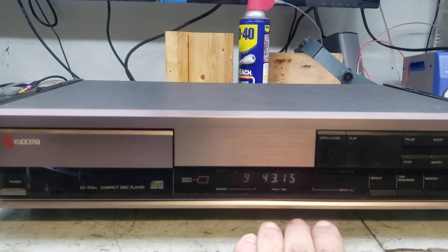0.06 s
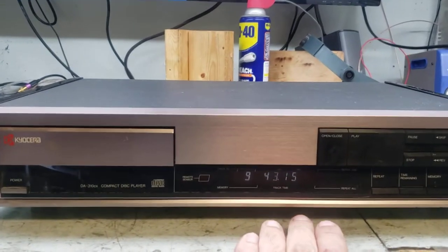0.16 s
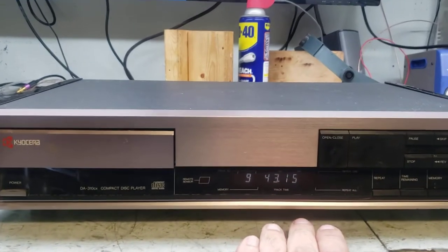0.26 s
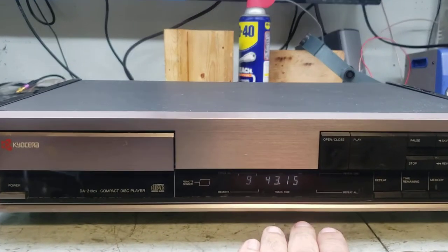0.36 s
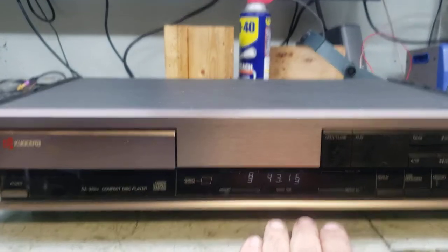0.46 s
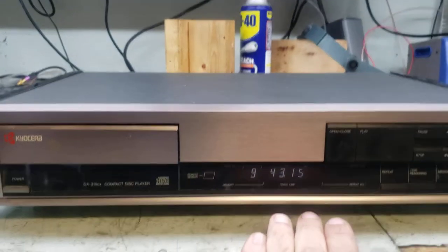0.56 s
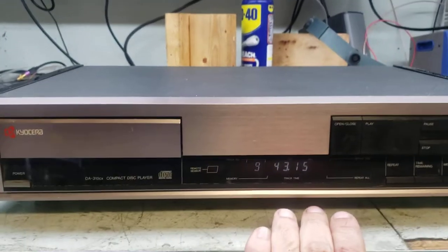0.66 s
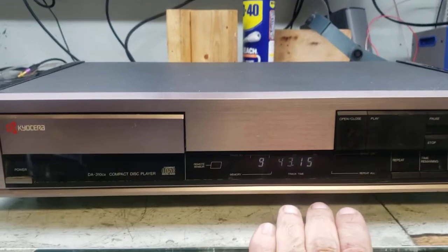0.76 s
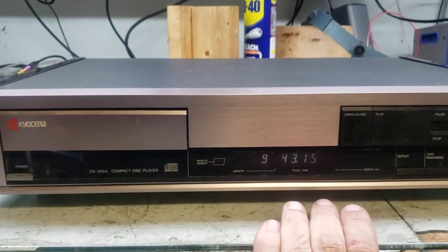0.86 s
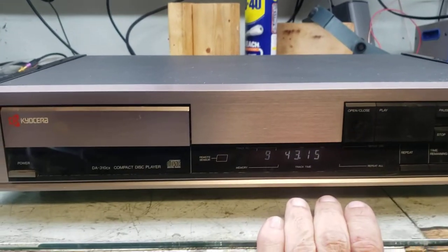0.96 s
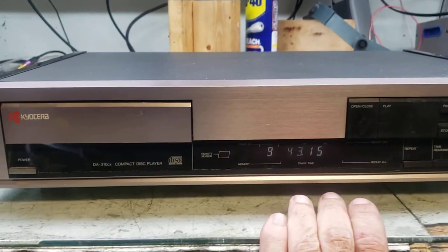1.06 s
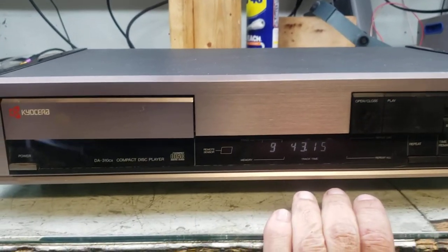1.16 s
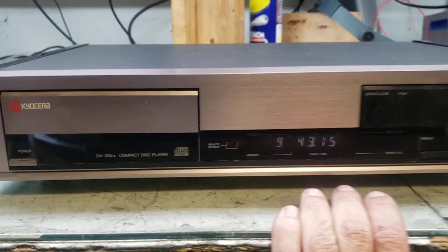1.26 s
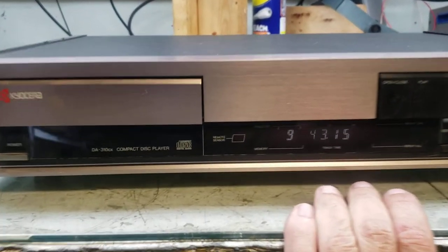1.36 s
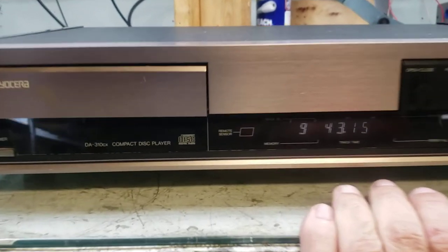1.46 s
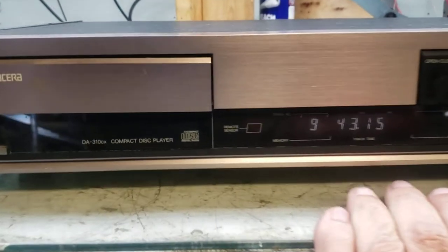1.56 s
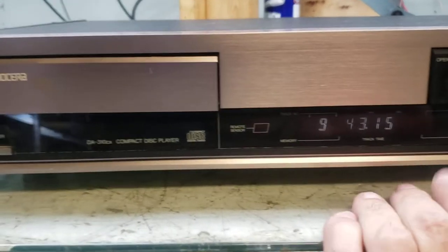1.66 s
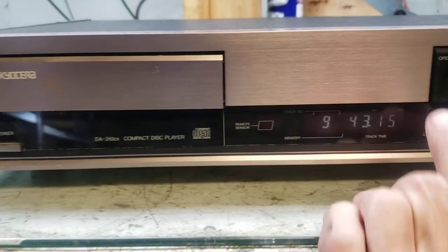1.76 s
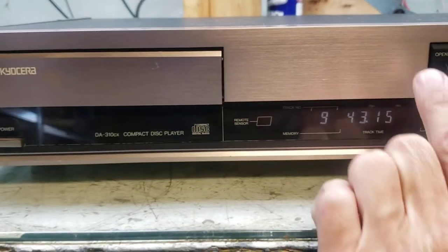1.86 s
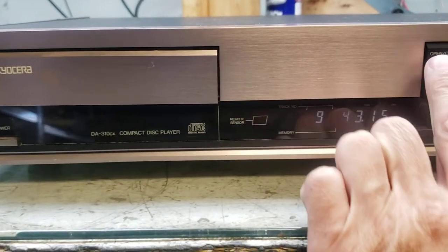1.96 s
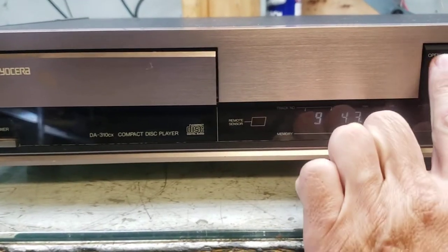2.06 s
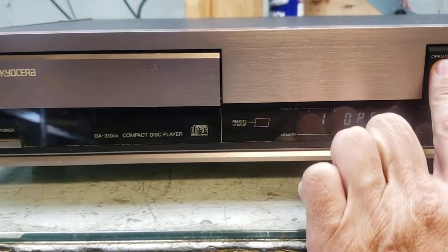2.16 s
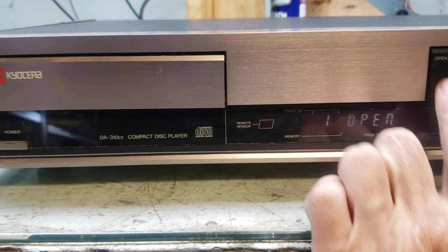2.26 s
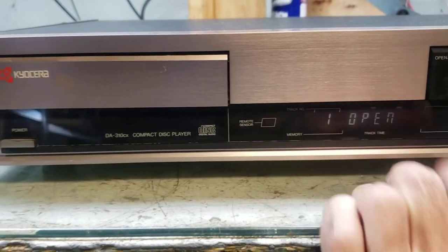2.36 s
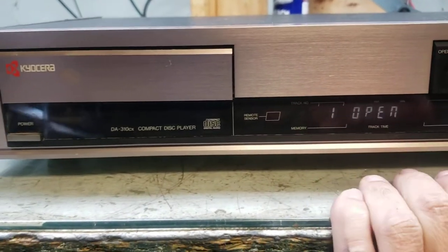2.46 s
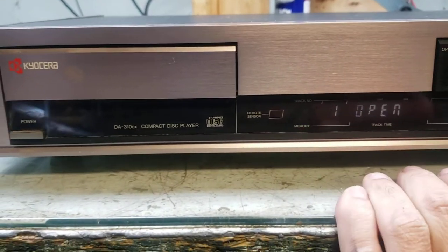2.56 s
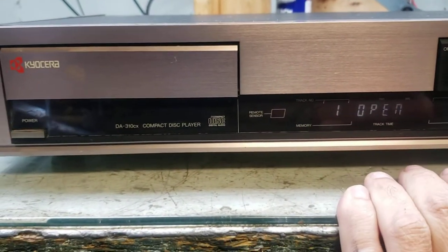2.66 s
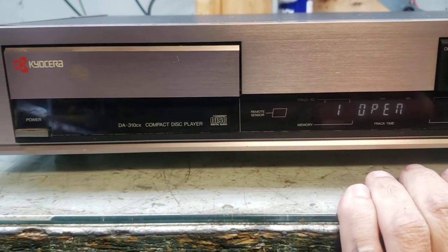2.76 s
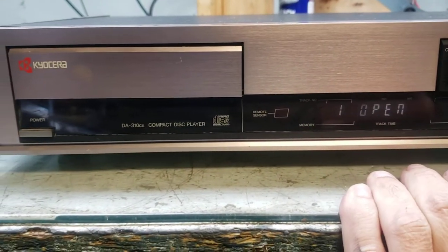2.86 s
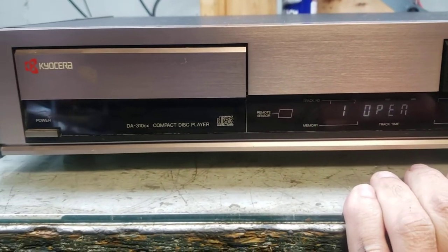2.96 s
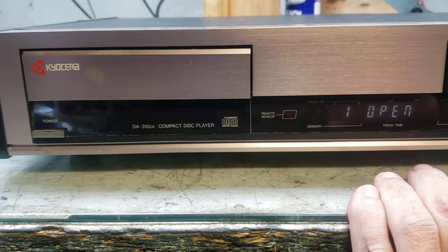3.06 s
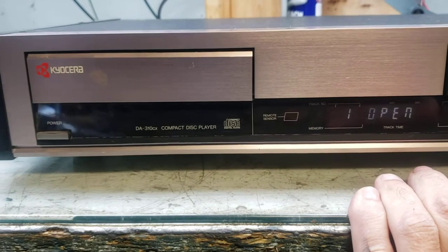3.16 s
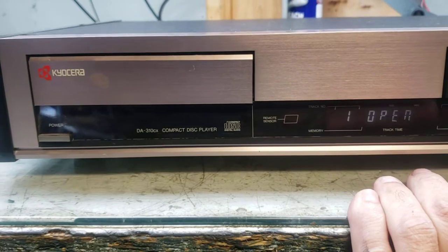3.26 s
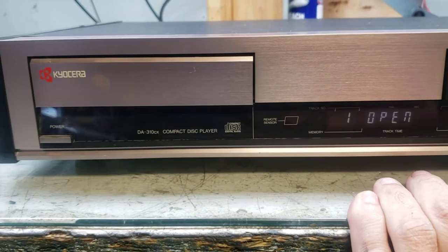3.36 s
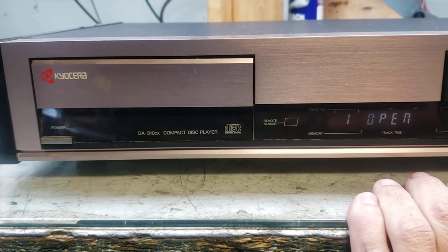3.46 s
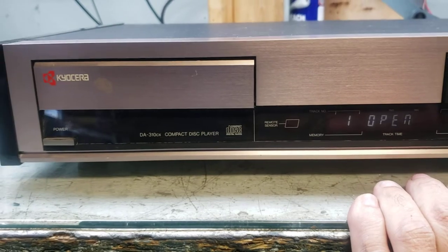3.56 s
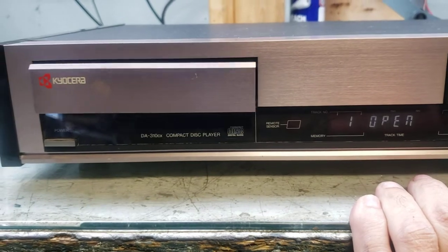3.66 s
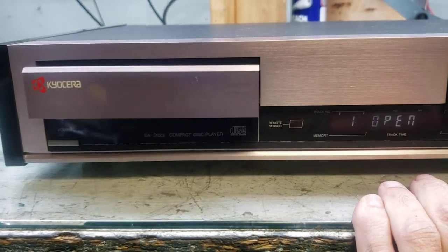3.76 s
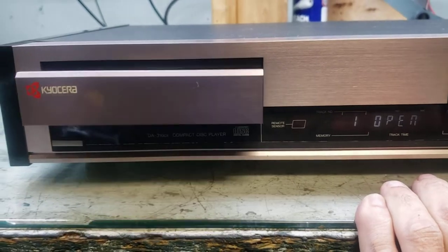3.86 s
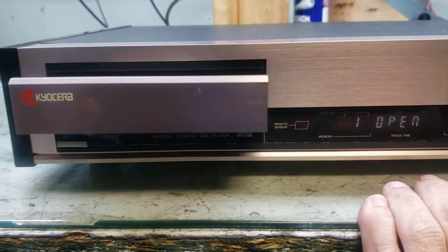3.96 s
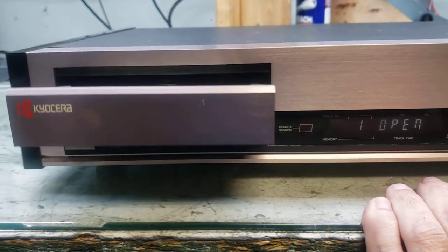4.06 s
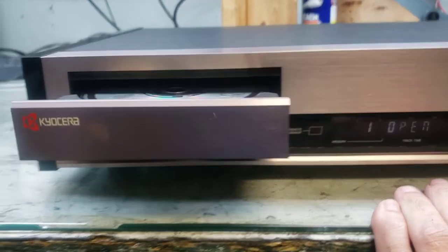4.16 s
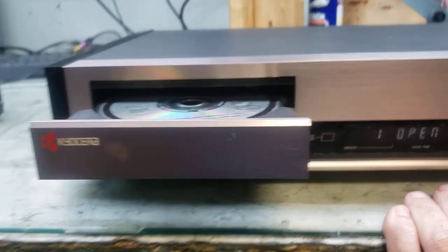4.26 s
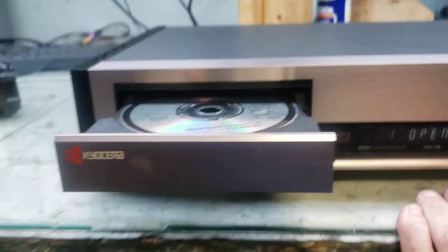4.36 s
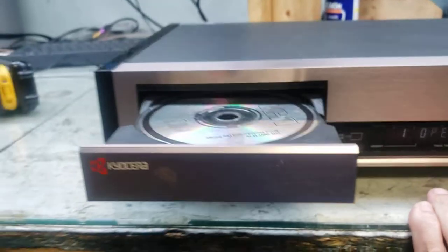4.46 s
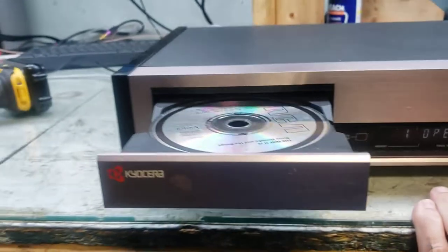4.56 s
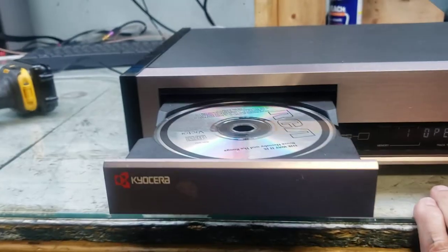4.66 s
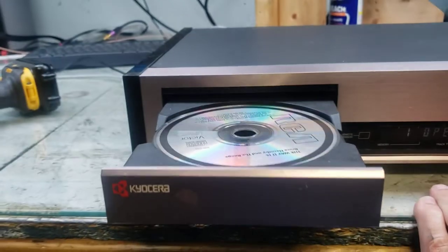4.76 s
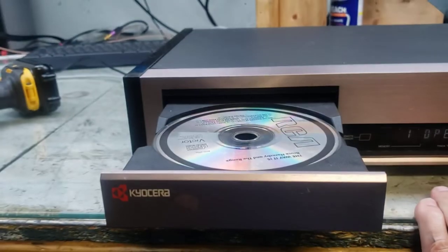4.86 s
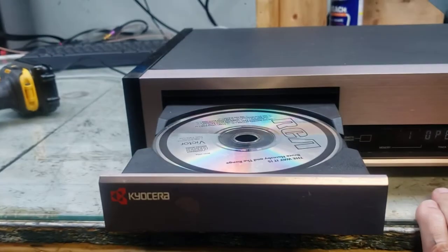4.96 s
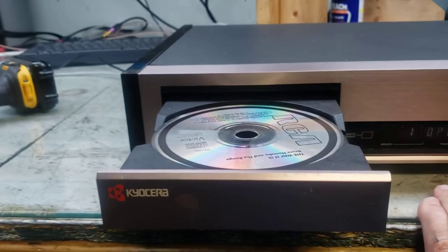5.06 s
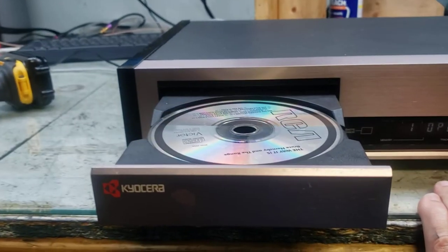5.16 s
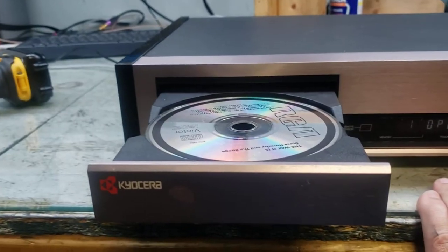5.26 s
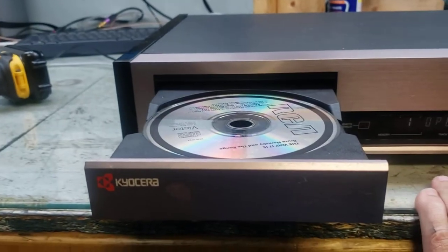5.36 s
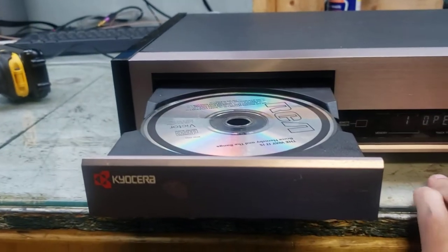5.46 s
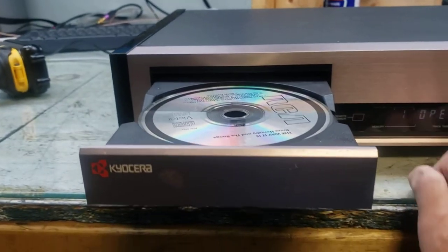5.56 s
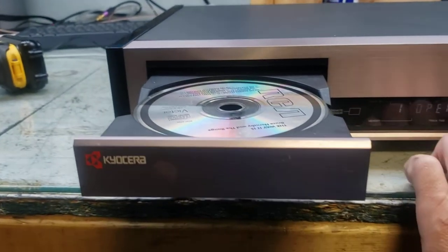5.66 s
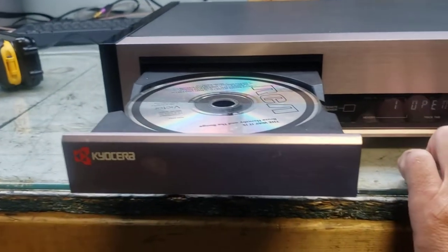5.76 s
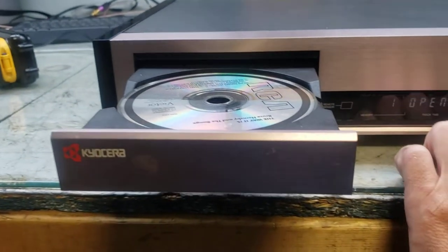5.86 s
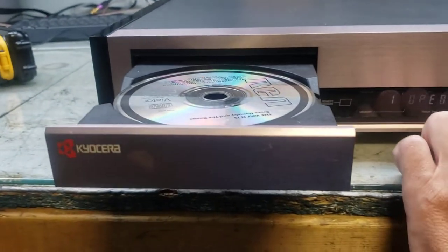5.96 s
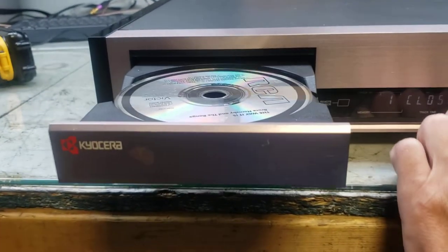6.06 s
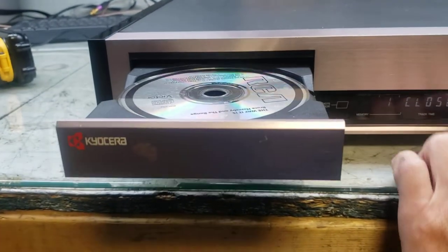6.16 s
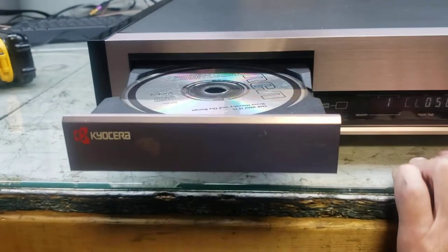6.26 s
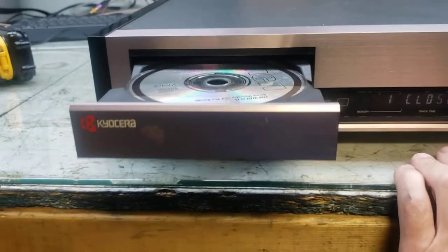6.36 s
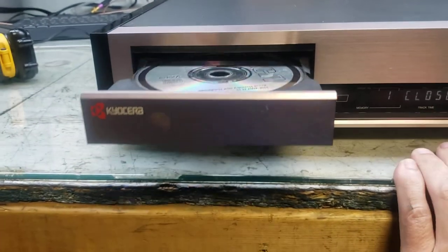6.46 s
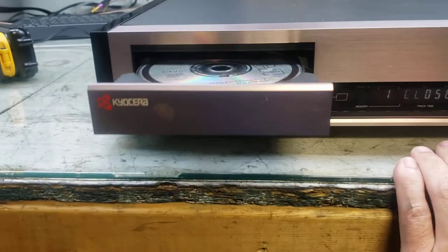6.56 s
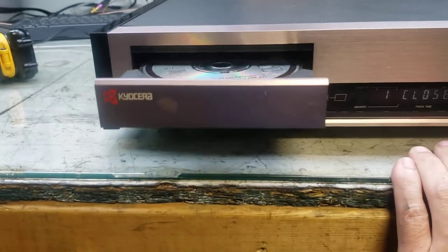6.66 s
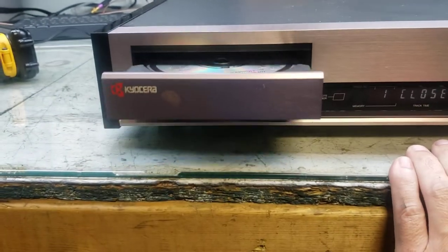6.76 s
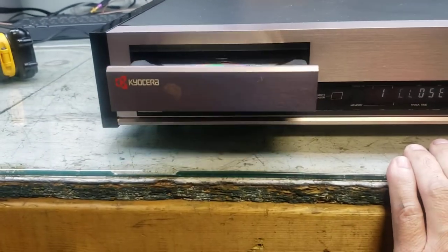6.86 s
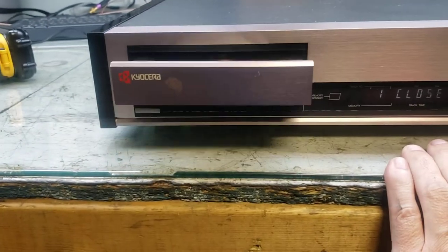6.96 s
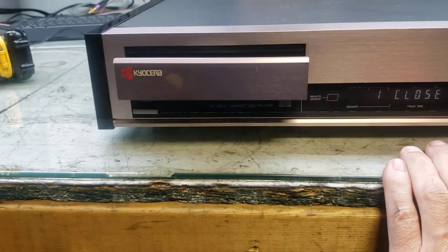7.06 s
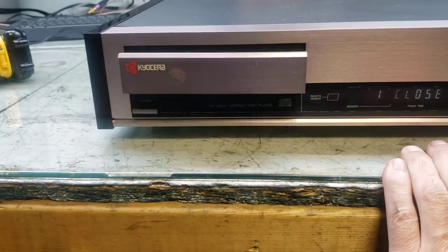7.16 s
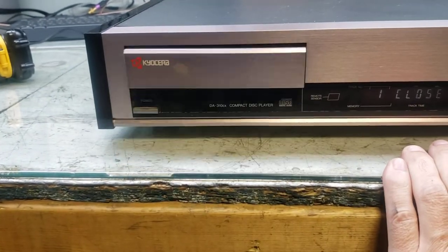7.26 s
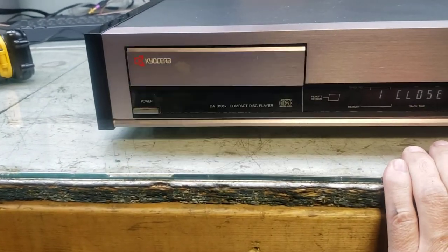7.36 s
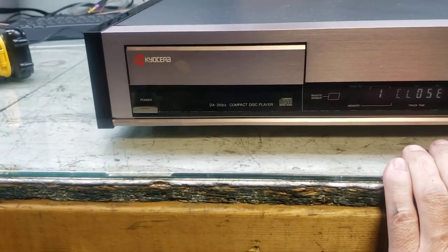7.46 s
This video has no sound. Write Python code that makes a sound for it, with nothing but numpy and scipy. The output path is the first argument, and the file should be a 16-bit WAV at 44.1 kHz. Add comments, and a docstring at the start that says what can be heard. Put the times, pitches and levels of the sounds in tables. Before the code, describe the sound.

A quiet workshop hums low and wavers slightly. Near the microphone, a button is touched, snapped and released, with a wisp of rubbing. After a soft low swell, the player's latch lets go in a solid clunk and its plastic tray hisses outward, stopping gently. Following a pause, another click starts the return slide, which finishes with several tight plastic and metal knocks and a short, dull bench reflection.

```python
"""A disc player on a workbench, over motor hum, room rumble and hiss: skin and sleeve brush by, and a finger presses
the open button. A low drone swells and fades; the latch lets go with a clunk and the tray slides out.
A second press draws it back in and it rattles shut. Hum is a sum of sines, rubbing is coloured noise,
and each contact is a burst of tiny impacts exciting damped modes. Two unlike microphones colour it all."""
import sys
import numpy as np
from scipy import signal
from scipy.fft import rfft, irfft
from scipy.io import wavfile
from scipy.ndimage import uniform_filter1d, map_coordinates

SR = 44100
rng = np.random.default_rng(int(sys.argv[2]) if len(sys.argv) > 2 else 0)


def dump(signal):
    """Clip the signal to [-1, 1] and save it as 16-bit WAV at the path in sys.argv[1]."""
    limited = np.clip(np.atleast_2d(signal).T, -1, 1)
    pcm = np.round(limited * 32767).astype(np.int16)
    wavfile.write(sys.argv[1], SR, pcm)


N = 331632
SIDES = np.array([[.5], [-.5]])  # shares a left-right difference equally


def from_db(db):
    """Level definition: decibels to amplitude gain."""
    return 10 ** (np.asarray(db) / 20)


def rms_one(x):
    """Normalisation: scale to rms 1."""
    return x / np.sqrt(np.mean(x ** 2) + 1e-20)


EDGE_S = .04  # fade before and after each curve


def in_time(spans):
    """Envelope interpolation: level columns at every sample, silent outside each span."""
    rows = []
    for span in spans:
        silence = [-120] * (len(span[0]) - 1)
        rows.append((span[0][0] - EDGE_S, *silence))
        rows.extend(span)
        rows.append((span[-1][0] + EDGE_S, *silence))
    s, *columns = np.transpose(rows)
    return [np.interp(np.arange(N) / SR, s, column) for column in columns]


def at_hz(points, size):
    """Spectral interpolation: an (f, value) table on a log frequency axis, read at the FFT bins."""
    hz, value = np.transpose(points)
    return np.interp(np.log(np.fft.rfftfreq(size, 1 / SR) + 1), np.log(hz + 1), value)


def drift(rate):
    """Slow random modulation: a cubic spline through about 2 * rate random knots a second."""
    knots = int(N / SR * rate * 2) + 4
    return map_coordinates(rng.standard_normal(knots), [np.linspace(1, knots - 2, N)], order=3)


def stereo_noise(spectrum, alike, size=N):
    """Partial correlation: coloured noise of rms 1 whose two sides have correlation alike."""
    mid, side = rfft(rng.standard_normal((2, size)))
    both = np.sqrt(1 + alike) * mid + np.sqrt(1 - alike) * side * [[1], [-1]]
    return rms_one(irfft(both * from_db(at_hz(spectrum, size)), size))


def resonance(x, hz, width_hz):
    """Simple resonator: a pole pair gives one peak of the given bandwidth; rms 1."""
    r = np.exp(-np.pi * width_hz / SR)
    return rms_one(signal.lfilter([1, 0, -1], [1, -2 * r * np.cos(2 * np.pi * hz / SR), r * r], x))


# room rumble: f/Hz, relative density/dB per Hz
RUMBLE_COLOUR = [(15, -42), (28, -10), (42, 4.5), (51, -13.5), (59, -2.5), (72, -5.5), (90, -13.5),
                 (106, -11), (135, -16.5), (175, -8), (225, -16.5), (310, -21.5), (400, -36.5), (550, -66)]
# far room noise and microphone hiss: f/Hz, relative density/dB per Hz
HISS_COLOUR = [(220, -22), (380, -2), (550, -8), (780, -7), (1000, -13.5), (1300, -12), (2000, -18),
               (5900, -25), (6200, -21.5), (7200, -18), (8350, -29.5), (10000, -23.5), (11000, -17),
               (15650, -15.5), (15800, -54.5)]
# stereo balance of the hiss: f/Hz, left minus right level/dB
HISS_BALANCE = [(1000, 2), (2400, 0), (3800, 5.5), (5500, -3), (6600, 1), (8000, 7), (10500, 9.5),
                (15000, 1.5)]
# likeness of the two sides of the room noise: f/Hz, correlation/1
ROOM_CORRELATION = [(30, 1), (300, 0.91), (640, 0.2), (1400, 0.028), (3000, 0.011)]
RUMBLE_DB, HISS_DB = -50, -73


def room_noise():
    """Diffuse field: the two sides correlate in the bass and hardly in the treble."""
    alike = at_hz(ROOM_CORRELATION, N)
    hiss = stereo_noise(HISS_COLOUR, alike)
    hiss = irfft(rfft(hiss) * from_db(SIDES * at_hz(HISS_BALANCE, N)), N)
    return from_db(RUMBLE_DB) * stereo_noise(RUMBLE_COLOUR, alike) + from_db(HISS_DB) * hiss


# motors in the workshop, two tones near 117 Hz beating: f/Hz, rms level/dB, wavering per unit drift/dB
HUM_TONES = [(58.46, -43.5, -1.3), (115.8, -65, 8), (118.3, -73, 1), (159.6, -63, 1), (232.1, -69.5, 3),
             (531, -89, 1.5), (790, -92, -3.5)]
# a low drone swells, gliding up to its pitch, and fades
DRONE_PEAK_S, DRONE_RISE_S, DRONE_FALL_S = 2.95, 0.26, 0.48
DRONE_DB, DRONE_SWELL_DB = -51, 13  # rms at the peak; drop one rise or fall time away
DRONE_HZ, DRONE_GLIDE_HZ_PER_S = 137, 45


def hum():
    """Superposition: steady-pitched sines waver in level and beat; a gliding drone joins them."""
    t = np.arange(N) / SR
    tones = 0
    for hz, db, waver_db in HUM_TONES:
        level_db = db + waver_db * drift(2.8)
        tones += from_db(level_db) * np.sin(2 * np.pi * (hz * t + rng.random()))
    early, late = np.maximum(DRONE_PEAK_S - t, 0), np.maximum(t - DRONE_PEAK_S, 0)
    away = early / DRONE_RISE_S + late / DRONE_FALL_S
    drone_hz = DRONE_HZ - DRONE_GLIDE_HZ_PER_S * early
    drone = from_db(DRONE_DB - DRONE_SWELL_DB * away ** 2) * np.sin(2 * np.pi * np.cumsum(drone_hz) / SR)
    return np.sqrt(2) * (tones + drone)  # a sine of rms 1 peaks at sqrt(2)


BENCH_T60_S = .17


def bench(x):
    """Reverberation: bench and wall return a short dull tail, convolved in independently on each side."""
    t = np.arange(SR // 2) / SR
    tail = stereo_noise([(200, -8.5), (2500, -2), (16000, -10.5)], 0, size=len(t))
    tail = tail * from_db(-60 * t / BENCH_T60_S) * (t > .004)
    return signal.fftconvolve(x, tail / np.sqrt(np.sum(tail[0] ** 2)), axes=1)[:, :N]


# skin and sleeve as the hand reaches and leaves: t/s, duller part level/dB, brighter part level/dB
BRUSH_LEVELS = [
    [(1.68, -83, -90), (1.862, -81, -71.5), (2.06, -80, -71)],
    [(2.28, -76, -69), (2.332, -74.5, -75), (2.36, -67.5, -64), (2.462, -67.5, -57.5), (2.51, -79, -74),
     (2.574, -84, -89)],
]
# colours of the two parts: f/Hz, relative density/dB per Hz
DULL_COLOUR = [(4000, -18.5), (5100, -16), (6900, 1), (7600, -2), (8400, -12), (9000, -38)]
BRIGHT_COLOUR = [(8000, -22), (8800, -8.5), (10600, 0), (13000, -4), (15600, 5.5), (15800, -44)]


def brushing():
    """Friction noise: two coloured bands follow the hand and flutter; the right side is 6 dB louder."""
    hand = 0
    for db, colour in zip(in_time(BRUSH_LEVELS), [DULL_COLOUR, BRIGHT_COLOUR]):
        hand += from_db(db + 2.5 * drift(24.0)) * stereo_noise(colour, 0.085)
    return from_db(-6 * SIDES) * hand


# tray out, then in: start t/s, stop t/s, rub level/dB, extra level of resonances above 8 kHz/dB
TRAY_TRAVELS = [(3.537, 4.871, -67.5, 2.5), (6.02, 7.38, -69, 8)]
# colour of the rails rubbing: f/Hz, relative density/dB per Hz
RAIL_COLOUR = [(500, -15.5), (1000, -10.5), (1900, -14.5), (2900, -12.5), (4500, -12.5), (5900, -14),
               (6500, -7), (7200, -4.5), (8400, -13.5), (9300, -7), (10600, -6), (13700, -3.5), (15650, 2),
               (15800, -47)]
# tray resonances, each swelling at one place on the rails (0 shut, 1 open):
# f/Hz, width/Hz, level/dB, swell level/dB, place/1, span/1
RAIL_RESONANCES = [(1337, 230, -82, 3, .48, 0.12), (2305, 81, -91, 10.5, .6, 0.07),
                   (2850, 390, -96, 19, 0.04, 0.22), (3770, 490, -85.5, 2.5, 0.54, 0.5),
                   (9700, 540, -91, 12, 0.39, 0.13), (12000, 850, -82.5, 6, 0.52, 0.27)]
# one scuff after each catch of the latch or a rack tooth: t/s, f/Hz, level/dB, t60/s
CATCH_SCUFFS = [(3.715, 3060, -65.5, 0.67), (4.022, 3840, -69.5, 0.74), (4.562, 3680, -62.5, 0.18),
                (6.414, 3950, -68, 0.4), (7.005, 3700, -70, 0.26)]
# where the rails bind: place/1 on the way out, then in
BIND_PLACE = [0.54, 0.36]
# extra rub as each travel starts: level/dB on the way out, then in
START_RUB_DB = [2.5, 1]
BIND_SPAN, BIND_DB, START_FADE_S = .14, 4, 0.096
LATCH_LAG_S = 0.11  # the motor runs this long before the tray comes free
SCUFF_WIDTH_HZ = 500


def slide():
    """Sliding friction: the rails hiss, and broad resonances swell with the place of the tray."""
    t = np.arange(N) / SR
    (out_s, open_s, _, _), (in_s, shut_s, _, _) = TRAY_TRAVELS
    place = np.interp(t, [out_s + LATCH_LAG_S, open_s, in_s, shut_s], [0, 1, 1, 0])
    rub_db, top_db = in_time([[(start, *db), (stop, *db)] for start, stop, *db in TRAY_TRAVELS])
    moving_db = np.minimum(top_db, 0)  # 0 dB in motion, silent at rest

    bind = np.exp(-((place - np.where(t < in_s, *BIND_PLACE)) / BIND_SPAN) ** 2)
    since_start = np.maximum(t - np.where(t < open_s, out_s, in_s), 0)
    start_db = np.where(t < open_s, *START_RUB_DB) * np.exp(-since_start / START_FADE_S)
    rub_db = rub_db + BIND_DB * bind + start_db + .8 * drift(25)
    out = from_db(rub_db) * stereo_noise(RAIL_COLOUR, 0.074)

    white = stereo_noise([(300, 0.0038), (16000, 0.044)], 0.2)  # practically flat
    for hz, width_hz, db, swell_db, at, span in RAIL_RESONANCES:
        level_db = db + swell_db * np.exp(-((place - at) / span) ** 2)
        level_db = level_db + (top_db if hz > 8000 else moving_db) + 2.5 * drift(12.)
        out += from_db(level_db) * resonance(white, hz, width_hz)
    for s, hz, db, t60 in CATCH_SCUFFS:
        decay = (t > s) * from_db(db - 60 * np.abs(t - s) / t60)
        out += decay * resonance(white, hz, SCUFF_WIDTH_HZ)
    return out


# a small spring in the latch sings on after each jolt: t/s, peak level before onset and decay/dB
JOLTS = [(2.251, -63), (3.649, -34.5), (7.452, -66)]
SPRING_HZ, SPRING_T60_S = 1473, .33


def spring():
    """Free vibration: one damped mode with a 3 ms onset, 2 dB louder on the right."""
    start_s, peak_db = np.transpose(JOLTS)[:, :, None]
    since = np.maximum(np.arange(N) / SR - start_s, 0)
    swing = from_db(peak_db - 60 * since / SPRING_T60_S) * (1 - np.exp(-since / .003))
    return np.sum(swing * np.sin(2 * np.pi * SPRING_HZ * since), axis=0) * from_db([[-1.], [1.]])


def ringing(modes, chatter, share, lag_ms):
    """Modal synthesis: chatter excites damped modes, the left side lagging; the loudest 12 ms have rms 1."""
    hz, db, t60 = np.transpose(modes)[:, :, None]
    t = np.arange(len(chatter)) / SR
    # each strike varies the mode strengths, in common and per side
    shared, own = rng.normal(0, 1.5, hz.shape), rng.normal(0, 2.5, (2, *hz.shape))
    # even out what the chatter happens to hold at each mode
    shake = np.abs(np.exp(-2j * np.pi * hz * t[:2000]) @ chatter[:2000])[:, None]
    db = db - 20 * np.log10(np.clip(rms_one(shake), .3, 3))
    turn = (-1) ** np.arange(len(hz))[:, None]  # neighbouring modes start in opposite directions
    sides = []
    for late_ms, tint_db in zip([lag_ms, 0], own):
        since = np.maximum(t - late_ms / 1000, 0)
        level_db = db + shared + tint_db - 60 * since / (share * t60)
        sides.append(np.sum(turn * from_db(level_db) * np.sin(2 * np.pi * hz * since), axis=0))
    out = signal.fftconvolve(sides, chatter[None], axes=1)[:, :len(t)]
    return out / np.sqrt(uniform_filter1d(np.mean(out ** 2, axis=0), size=530).max())


# modes of the front panel and of the sheet metal case: f/Hz, level/dB, free t60/s
PANEL_MODES = [(748, 3, 0.11), (834, -8, 0.2), (745, -12.5, 0.096), (1041, -8, 0.11)]
CASE_MODES = [(92, -9, .3), (140, -14, .25), (255, -11, .2), (287, -7, .2), (328, -4, .3), (345, 0, .3),
              (395, -13, .15), (447, -14, .3), (466, -11, .25), (540, -7, .28), (587, -6, .26),
              (630, -17, .15), (910, -16, .15)]
# clatter of loose parts: f/Hz, relative density/dB per Hz
LOOSE_COLOUR = [(200, -56), (500, -33.5), (1200, 7.5), (2500, 1), (4200, -3), (6000, -19)]
RISE_MS, RISE_SHARE = .3, 0.047  # a contact builds up over this time plus a share of its hold


def contacts(rows, plastic, crack_colour, lag_ms, clatter_db):
    """Impact excitation: uneven tiny impacts crack, shake loose parts, and ring plastic and metal."""
    out, ms = np.zeros((2, N + SR)), np.arange(SR // 3) * 1000 / SR
    for s, crack_db, plastic_db, panel_db, case_db, hold_ms, t60_ms, share in rows:
        rise_ms = RISE_MS + RISE_SHARE * hold_ms
        after_hold_ms = np.maximum(ms - rise_ms - hold_ms, 0)
        shape = np.minimum(ms / rise_ms, 1) * from_db(-60 * after_hold_ms / t60_ms)
        chatter = shape * from_db(3.32 * rng.exponential(1, len(ms))) * rng.standard_normal(len(ms))
        # the sharper the contact, the more one leading impact stands out
        chatter[round(rise_ms * SR / 2000)] += 20. / rise_ms

        sound = from_db(crack_db) * shape * stereo_noise(crack_colour, 0.16, size=len(ms))
        slower = signal.lfilter([.006], [1, -.994], shape)  # loose parts settle a little later
        clatter = slower / slower.max() * stereo_noise(LOOSE_COLOUR, 0.14, size=len(ms))
        sound += from_db(plastic_db + clatter_db) * clatter
        for modes, db in [(plastic, plastic_db), (PANEL_MODES, panel_db), (CASE_MODES, case_db)]:
            sound += from_db(db) * ringing(modes, chatter, share, lag_ms)
        start = round(s * SR)
        out[:, start:start + len(ms)] += sound
    return out[:, :N]


# finger on the button: touch, snap, rub while held, release; then touch, snap, release, faint rub after it:
# t/s, crack level/dB, plastic level/dB, front panel level/dB, case level/dB, hold/ms, chatter t60/ms,
# share of the free ring time/1
BUTTON_CONTACTS = [(2.0677, -51.5, -52, -53.5, -46, 13.5, 74, 0.52),
                   (2.1334, -37, -26, -55.5, -50.5, 0.98, 16, 0.99),
                   (2.172, -75, -58, -49, -45, 51, 60, 0.45),
                   (2.2465, -51, -44.5, -40.5, -37.5, 2, 32, 0.53),
                   (5.9546, -59.5, -57.5, -50.5, -64.5, 9, 25, 0.58),
                   (5.9851, -48, -28.5, -46.5, -55.5, 1.3, 21.6, 0.88),
                   (6.1037, -64, -54, -46.5, -47.5, 7.8, 17, 0.45), (6.125, -75, -70, -78, -56, 16, 80, .4)]
# modes of the button: f/Hz, level/dB, free t60/s
BUTTON_MODES = [(1250, -3, .045), (1400, -4, .03), (1534, 0, .045), (1640, 1, .045), (1810, -3, .045),
                (2000, -11, .05), (2290, -16, .04), (2580, -12, .035), (2960, -13, .035), (3350, -16, .03),
                (3660, -17, .025), (3950, -10, .03), (4750, -22, .025)]
# crack of the button: f/Hz, relative density/dB per Hz
BUTTON_CRACK = [(1500, -24), (2700, -12.5), (3900, -9.5), (5000, -14.5), (6400, 2), (7500, -5), (8700, -16),
                (10000, 0.5), (12200, 4.5), (13600, -0.5), (15600, -3), (15900, -20), (16500, -26.5)]


def button_presses():
    """Modal excitation of the button by the finger, 0.14 ms later on the left."""
    return contacts(BUTTON_CONTACTS, BUTTON_MODES, BUTTON_CRACK, lag_ms=0.14, clatter_db=-9)


# latch, rack and tray contacts: t/s, crack level/dB, plastic level/dB, front panel level/dB,
# case level/dB, hold/ms, chatter t60/ms, share of the free ring time/1
TRAY_CONTACTS = [(3.536, -78, -61, -58.5, -64.5, 14, 84, 0.95),
                 (3.5576, -68.5, -59, -70, -62.5, 8., 170, 1.3),
                 (3.6083, -52, -34.5, -44, -46.5, 1.3, 47, 0.84),
                 (3.6422, -65, -40, -31.5, -28, 24., 48, 0.85), (3.6463, -32, -41, -41.5, -33, 3.9, 16, .8),
                 (3.652, -41, -45, -31, -56, 6, 31.4, 0.35), (3.692, -44.5, -37.5, -36.5, -36, 8, 13, 1.1),
                 (4.02, -79.5, -69, -70, -66.5, 7.6, 74, 0.15), (4.5587, -55.5, -61, -76, -84, 4, 24, 0.73),
                 (4.8341, -48.5, -66.5, -77, -71, 1.8, 42, 0.61),
                 (4.847, -76.5, -64.5, -77, -69, 5.2, 40, 0.31),
                 (6.4103, -57, -64, -70, -68, 2.6, 34, 0.71), (7.0, -72.5, -73.5, -72.5, -73, 22, 55, .5),
                 (7.3116, -63, -82, -73, -66, 4.8, 37, 0.56), (7.355, -57, -67, -64, -60.5, 10, 30, 0.59),
                 (7.3711, -51, -47.5, -44, -45, 5.8, 63, 0.4),
                 (7.3753, -27.5, -43, -58, -58, 1.3, 20, 0.59),
                 (7.38, -45, -41.5, -40, -39.5, 15, 36, 0.37), (7.4, -37, -37.5, -45, -46, 12, 103, 0.48),
                 (7.4495, -31, -37.5, -43.5, -63.5, 6, 59, 1.1),
                 (7.466, -38.5, -38.5, -49, -44.5, 6, 35, 1.15)]
# modes of the plastic tray: f/Hz, level/dB, free t60/s
TRAY_MODES = [(950, -4, .04), (1110, -1, .04), (1270, 0, .05), (1400, -2, .04), (1620, -5, .04),
              (1790, -3, .04), (2130, -7, .04), (2300, -10, .035), (2530, -9, .03), (2800, -10, .03),
              (3260, -10, .03), (3750, -7, .035), (4300, -13, .025)]
# crack of the tray contacts: f/Hz, relative density/dB per Hz
TRAY_CRACK = [(1500, -46), (2700, -12), (3700, -3.5), (4300, -11), (5900, -9), (7000, -10), (8500, -10.5),
              (10000, -4), (12000, -6), (13600, -1.5), (15600, -5.5), (15900, -20), (16500, -10)]


def tray_knocks():
    """Modal excitation of the tray by latch, rack and tray contacts, 0.12 ms later on the left."""
    return contacts(TRAY_CONTACTS, TRAY_MODES, TRAY_CRACK, lag_ms=0.12, clatter_db=-4)


BENCH_DB = -13


def scene():
    """Superposition of room, hand and player; only the contacts and the spring reach the bench reverberation."""
    background = room_noise() + hum()
    hand = brushing()
    hits = button_presses() + tray_knocks() + spring()
    return background + hand + slide() + hits + from_db(BENCH_DB) * bench(hits)


# the microphones differ in colour: f/Hz, left minus right level/dB
MIC_LEVEL_DIFFERENCE = [(60, -1.6), (100, -1.5), (240, 1), (1000, -2), (1700, -4), (2400, 3.5),
                        (3800, -3.5), (5200, 4), (6500, 13.5), (7500, 14.5), (8700, -2.5), (9400, -2.5),
                        (10800, 0), (12200, -10.5), (14000, -4)]
# and, in the bass, in phase: f/Hz, lead of the left/rad
MIC_PHASE_LEAD = [(60, 0.54), (120, 0.65), (200, 0.011), (400, 0.042)]
CUTOFF_HZ = 16900


def record(dry):
    """Linear filtering: each microphone tilts level and phase its own way; a low-pass cuts the top."""
    level = from_db(SIDES * at_hz(MIC_LEVEL_DIFFERENCE, N))
    phase = np.exp(1j * SIDES * at_hz(MIC_PHASE_LEAD, N))
    heard = irfft(rfft(dry) * level * phase, N)
    return signal.sosfilt(signal.cheby2(12, 70, CUTOFF_HZ, fs=SR, output="sos"), heard)


dry = scene()
out = record(dry)
dump(out)
```